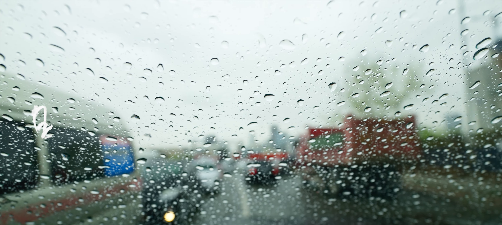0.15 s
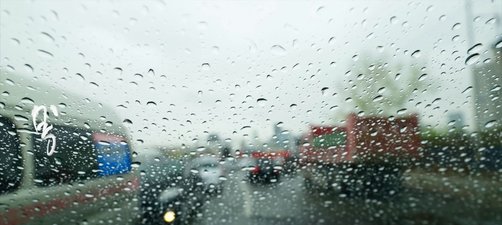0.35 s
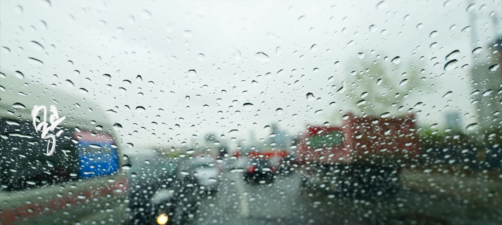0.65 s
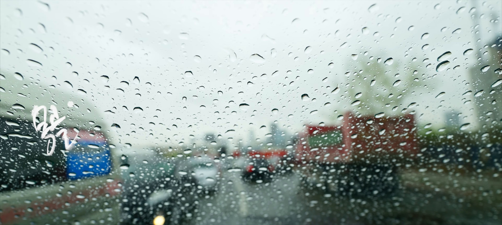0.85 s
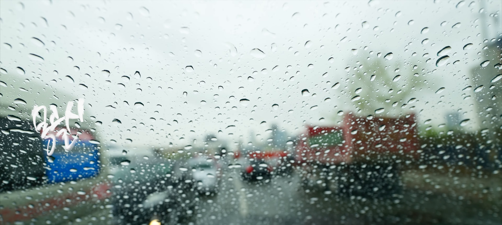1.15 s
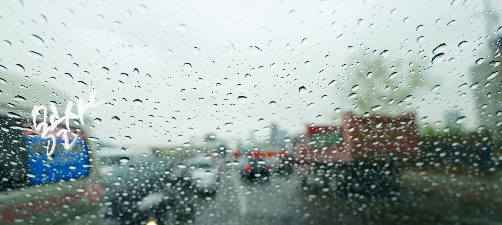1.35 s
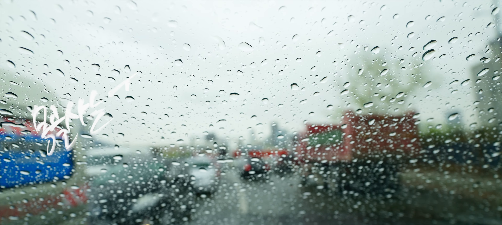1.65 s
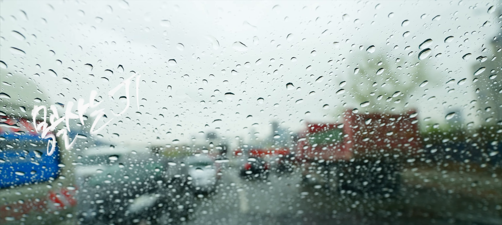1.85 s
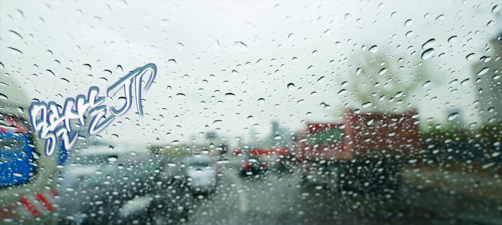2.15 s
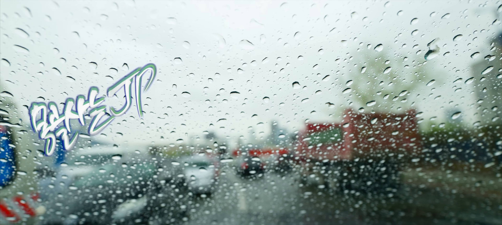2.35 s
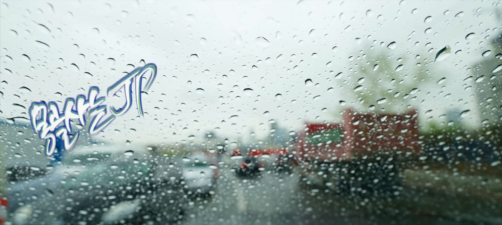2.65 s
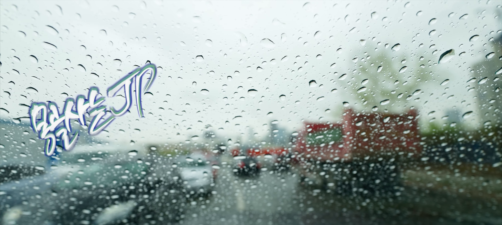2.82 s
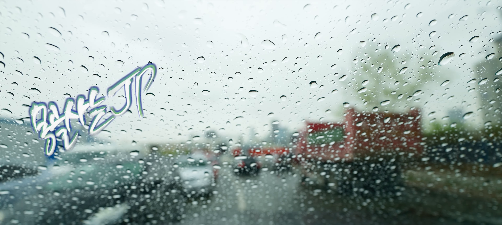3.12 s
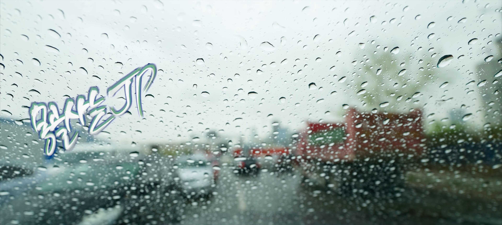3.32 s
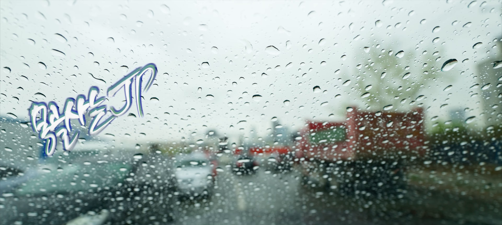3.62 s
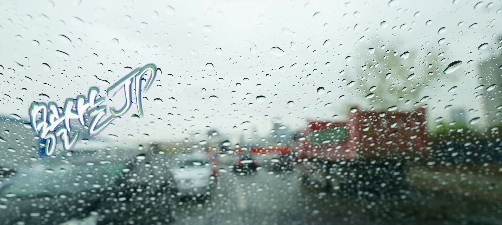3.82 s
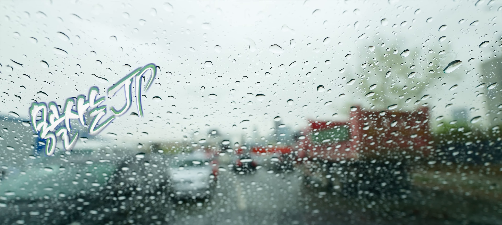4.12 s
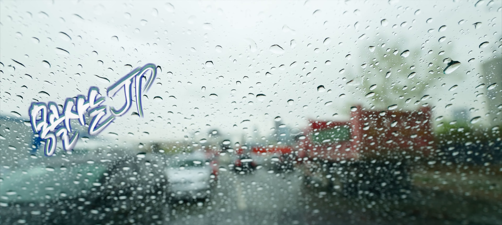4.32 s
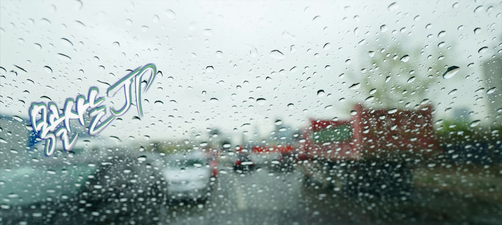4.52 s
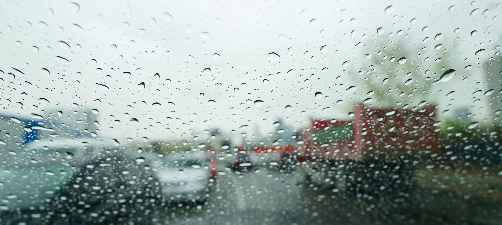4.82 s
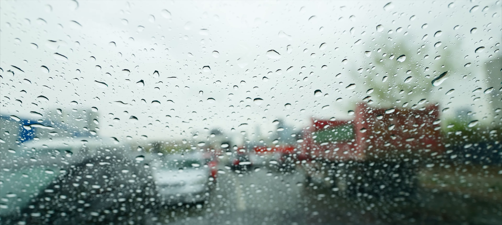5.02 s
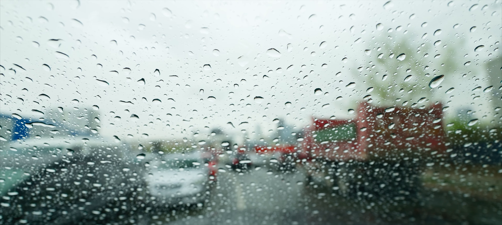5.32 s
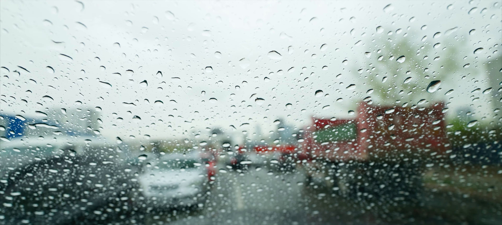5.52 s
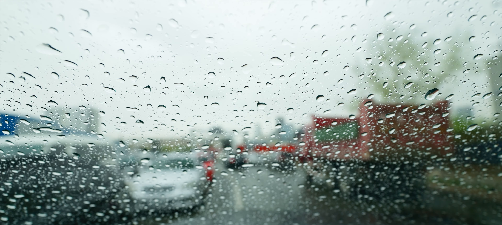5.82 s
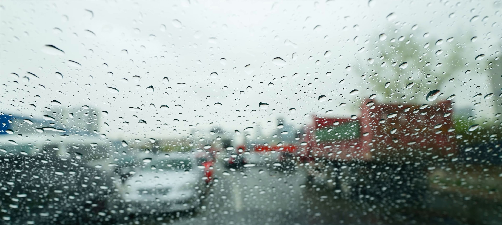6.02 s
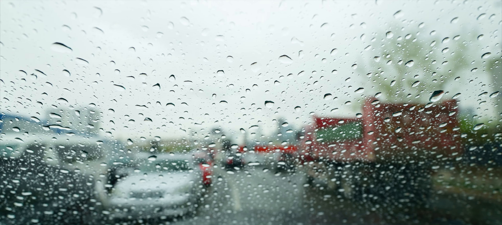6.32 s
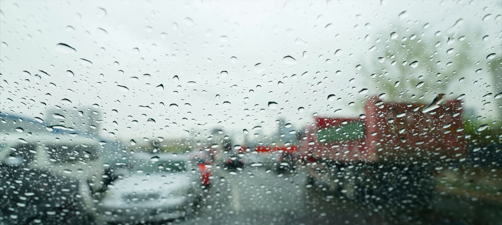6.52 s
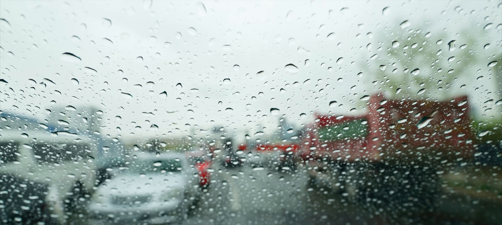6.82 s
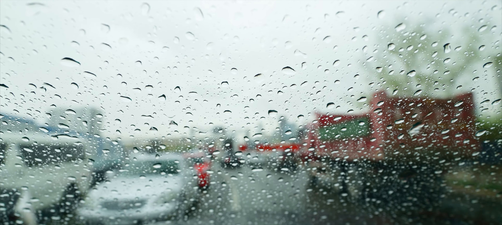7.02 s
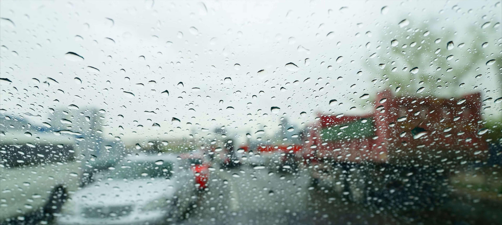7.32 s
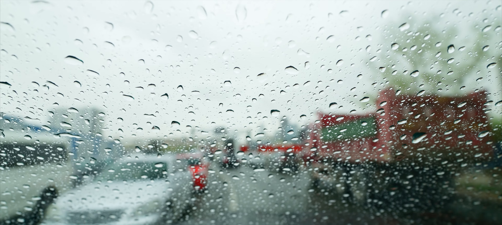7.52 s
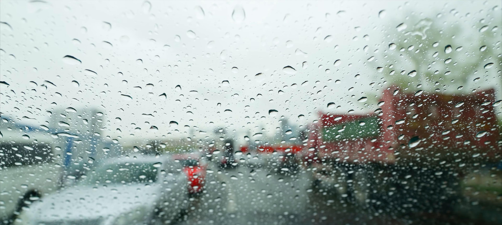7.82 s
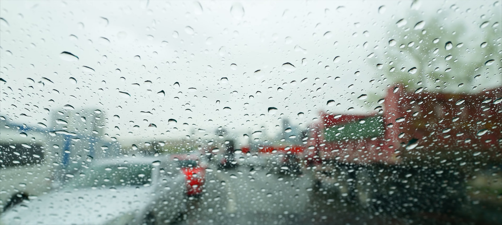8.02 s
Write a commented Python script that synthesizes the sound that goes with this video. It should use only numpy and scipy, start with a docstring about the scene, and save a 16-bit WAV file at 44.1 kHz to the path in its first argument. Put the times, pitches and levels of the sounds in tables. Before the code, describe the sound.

Rain patters on a car's roof and windshield over road rumble, heard from inside as an engine hums and later revs up.

```python
"""Rainy traffic from inside a car

Drops patter on the lined roof and tick on the windshield, a few fat ones slapping the glass,
over a bed of road rumble and tyre roar. A low engine hum climbs in pitch, then drops back towards
idle. The body takes one soft bump; then the engine revs up, booming in the cabin and growling
in the exhaust, with a wet-tyre rush that grows with speed."""
import sys
import numpy as np
from scipy import signal
from scipy.fft import rfft, irfft, next_fast_len
from scipy.io import wavfile

SR = 44100
rng = np.random.default_rng(int(sys.argv[2]) if len(sys.argv) > 2 else 0)


def dump_mix(stems):
    """Bounce the given channels to the path in sys.argv[1] as a 16-bit WAV at rate SR."""
    frames = np.atleast_2d(stems).T  # one column per channel
    limited = np.clip(frames, -1, 1)  # hard clip at full scale
    pcm = np.round(limited * 32767).astype(np.int16)
    wavfile.write(sys.argv[1], SR, pcm)


N = 359876

# how hard the rain hits: (time [s], roof level [dB], windshield drive [dB])
RAINFALL = [(0, -35.5, -54), (0.45, -37, -54.5), (0.65, -36.5, -51), (1.4, -37, -52), (2.0, -36, -48.5),
            (2.9, -34.5, -48.5), (3.25, -35, -44.5), (3.8, -33, -44), (4.05, -34, -48.5), (4.7, -36, -45.5),
            (5.0, -34, -45.5), (5.3, -35.5, -45.5), (5.65, -33, -45.5), (6.7, -33, -44),
            (7.1, -32.5, -44.0), (7.75, -31.5, -46.0), (8.16, -35, -47)]
# drops landing together: (time [s], lift [dB])
FLURRIES = [(.53, 3), (1.54, 3), (2.48, 4.5), (3.06, 1.5), (3.26, 2.5), (3.47, 0), (4.19, 2), (4.88, 4),
            (5.6, 4), (5.83, 1), (6.07, 2), (6.52, 2), (7.089, 2), (7.74, 2)]
# a brief gap in the rain: (time [s], half length [s], dip [dB])
LULL = (5.912, 0.013, -5)
# panel and cabin resonances under the rain: (frequency [Hz], width [Hz], lift [dB])
PANEL_MODES = [(751, 80, 3), (945, 150, 1.8), (1122, 48, -4.5), (1250, 51, 1), (1450, 50, 3.5),
               (1930, 46, 1.5), (2450, 63, 4.5), (2710, 57, 2.9), (2984, 93, 3), (3370, 200, 0)]
# tone of the drops and the high hiss: (frequency [Hz], relative level [dB])
ROOF_EQ = [(200, -5), (450, 1), (700, -1.5), (1000, 1), (1500, -0.5), (2200, -6.5), (3000, -8.5),
           (4000, -15), (6000, -25.5), (9000, -48.5), (15000, -69)]
GLASS_EQ = [(400, -18), (1200, -5.5), (2200, 0.5), (3000, 3), (3900, -1.5), (5000, -6.5), (6000, -12),
            (6600, -16.5), (7150, -15), (7600, -26), (8800, -23), (10500, -31.5), (15500, -59)]
CRACK_EQ = [(1500, -16), (4000, -10.5), (7000, 10), (9000, 1), (12000, -3.5), (15500, -14), (19000, -31.5)]
SPLAT_EQ = [(500, -12), (1500, -4), (3000, 0), (4500, -5), (6000, -10.5), (7200, -14), (8000, -20.5),
            (11000, -31.5), (15500, -33)]
SIZZLE_EQ = [(2000, -18), (5000, 7), (9500, -2), (15500, -11)]
# tone of the road bed: (frequency [Hz], relative level [dB])
RUMBLE_EQ = [(5, -43), (14, -13.5), (22, -4), (32, -6.5), (44, -2), (62, -3), (85, -14), (150, -24.5),
             (400, -76), (2000, -110)]
DRONE_EQ = [(30, -18), (60, 2), (88, -6), (108, 13), (128, 8), (150, 3.5), (185, 0), (235, -3.8), (300, -8),
            (600, -56), (2000, -100)]
TYRE_EQ = [(150, -14.5), (215, -2.5), (278, -0.5), (320, -2), (360, -1), (405, -5), (455, 1), (530, -6),
           (620, -15.5), (1200, -22), (4000, -57.5), (10000, -93)]
# swells of the traffic's tyre roar and the body's rumble: (time [s], level [dB])
TYRE_LEVEL = [(0, -40.5), (1, -39.5), (2, -37.5), (3.6, -34), (4.5, -34.5), (5.2, -36.5), (6, -34.5),
              (7, -32), (8.16, -30)]
RUMBLE_LEVEL = [(0, -27.5), (.75, -30), (1.1, -26.5), (3.6, -24.5), (5.3, -27), (8.16, -27)]
# heavy drops on the windshield: (time [s], relative splat level [dB], relative crack level [dB])
FAT_DROPS = [(0.4305, -30, -54), (0.5242, -30, -65), (1.2271, -27, -62), (1.5205, -25, -56.5),
             (2.469, -27, -61), (3.0574, -22, -53), (3.2074, -24, -50), (3.5249, -23, -52),
             (3.7988, -30, -52), (3.8524, -23, -56), (4.3804, -27, -54), (5.0084, -27, -51),
             (5.3028, -24, -55), (5.5087, -26, -49), (5.6962, -20.5, -53), (5.7747, -20.5, -56),
             (5.8494, -23, -62), (5.9592, -24, -50), (6.1703, -31, -49), (6.2114, -21.5, -51),
             (6.9636, -26, -54), (7.0404, -22, -50), (7.485, -23, -60), (7.5384, -21, -49),
             (7.5638, -22, -49)]
# one swell of high hiss: (time [s], half length [s], level [dB])
SIZZLE_SWELL = (.8, 0.22, -60)
# engine speed for the low hum and the later rev: (time [s], crank speed [turns/s])
HUM_SPEED = [(0.9, 20.2), (1.58, 23), (2.19, 24.9), (2.44, 26.7), (2.96, 31.5), (4.34, 36.7), (4.6, 23)]
REV_SPEED = [(4.2, 22.6), (5.37, 22), (5.91, 23.2), (6.25, 25), (7.06, 34.3), (7.39, 37.9), (7.73, 40.7),
             (8.16, 40.4)]
# engine effort; the rev surges at idle, then opens up: (time [s], drive [dB])
HUM_EFFORT = [(.9, -25), (1.2, -19), (1.65, -31), (2.65, -18), (3.25, -18), (4.3, -23), (4.6, -29)]
REV_EFFORT = [(2.9, -27), (4.25, -27), (4.5, -17.5), (4.68, -26), (4.95, -17.5), (5.3, -17), (5.6, -26),
              (6.0, -14), (6.4, -12.5), (7.78, -12), (8.16, -32)]
# engine harmonics: (order [multiple of crank speed], relative level [dB])
HUM_ORDERS = [(2, -0.5), (4, -6.5)]
REV_ORDERS = [(2, -.7), (3, -5.5), (4, -.3), (5, -20)]
# the cabin's standing waves: (frequency [Hz], gain [dB])
CABIN_BOOM = [(36, -7), (50, 1.5), (60, -5.5), (71, -6), (80, -12.5), (90, -24.5), (100, -8.5), (110, -4.5),
              (121, -0.5), (134, -2.5), (137.5, -13.5), (141.5, -4.5), (158, -0.5), (166, -11)]
# a knock through the suspension: (time [s], drive [dB])
BUMP = (5.423, -14.5)
# the car body's ring: (frequency [Hz], relative level [dB], t60 [s])
BODY_MODES = [(166, 1.5, 0.071), (207, -0.5, 0.075), (410, -3.5, 0.055)]
# narrow exhaust resonances, plus one broad band of wet-tyre rush:
# (frequency [Hz], nominal width [Hz], relative level [dB])
GROWL_AND_RUSH_BANDS = [(274, 19.7, -2.5), (338.4, 18.5, -5.5), (357, 26, -17), (890, 40, -18),
                        (755, 450, -29), (1440, 21, -17.5)]


def from_db(db):
    """Decibels to gain."""
    return 10 ** (np.asarray(db) / 20)


def rms_one(x):
    """Scale to unit rms."""
    return x / np.sqrt(np.mean(x ** 2) + 1e-20)


def peak_one(x):
    """Scale to unit peak."""
    return x / np.max(np.abs(x))


def in_time(rows):
    """One value per sample for each column of an envelope."""
    times, *columns = np.transpose(rows)
    return [np.interp(np.arange(N) / SR, times, column) for column in columns]


def drift(rate_hz):
    """Slow random wobble of about unit rms."""
    pole = np.exp(-80 * np.pi * rate_hz / SR)   # one step per 40 samples
    slow = signal.lfilter([1], [1, -2 * pole, pole * pole], rng.standard_normal(N // 40 + 2002))[2000:]
    return np.interp(np.arange(N) / 40, np.arange(len(slow)), rms_one(slow))


def colour(x, eq, resonances=()):
    """Minimum-phase EQ with resonances on top."""
    size = 2 * next_fast_len(N // 2 + SR // 4)
    hz = np.maximum(np.arange(size // 2 + 1) * SR / size, 1)
    eq_hz, eq_db = np.transpose(eq)
    db = np.interp(np.log(hz), np.log(eq_hz), eq_db)
    for centre, width, lift in resonances:
        db = db + lift / (1 + (2 * (hz - centre) / width) ** 2)
    cepstrum = irfft(np.log(from_db(db)))
    cepstrum[1:size // 2] *= 2   # folded onto positive time, so nothing rings early
    cepstrum[size // 2 + 1:] = 0
    return irfft(rfft(x, size) * np.exp(rfft(cepstrum)))[:N]


def noise(eq):
    """Coloured noise of unit rms."""
    return rms_one(colour(rng.standard_normal(N), eq))


def resonate(x, hz, width_hz):
    """One resonance with unity gain at its peak."""
    r = np.exp(-np.pi * width_hz / SR)
    feedback = [1, -2 * r * np.cos(2 * np.pi * hz / SR), r * r]
    return signal.lfilter((1 - r * r) / 2 * np.array([1, 0, -1]), feedback, x)


def flurries(rise_s=0.016):
    """The rain's quick swings in dB: a random flutter, fast-rising flurries and one lull."""
    t = np.arange(N) / SR
    swing_db = 0.7 * drift(rate_hz=9)
    for at_s, lift_db in FLURRIES:
        age = np.maximum((t - at_s) / rise_s + 0.5, 0)
        swing_db += lift_db * age * np.exp(1 - age)
    at_s, half_s, dip_db = LULL
    return swing_db + dip_db * np.exp(-((t - at_s) / half_s) ** 2)


def impacts(per_s, spread_db, max_spreads):
    """Random drop impacts: many small, a few large."""
    sizes = from_db(spread_db * np.minimum(rng.exponential(1, N), max_spreads))
    return sizes * rng.choice([-1, 1], N) * (rng.random(N) < per_s / SR)


def on_panel(clicks, t60, ring_db, cabin_db, cabin_t60=0.063, spots=12):
    """Each drop lands on one of several spots: a click, that spot's dense ring, a short cabin tail."""
    t = np.arange(SR // 8) / SR
    decays = from_db(-60 * t / np.array([[t60], [cabin_t60]]))
    spot, out = rng.integers(0, spots, N), np.zeros(N)
    for k in range(spots):
        ring, tail = rng.standard_normal((2, len(t))) * decays
        response = from_db(ring_db) * ring / np.linalg.norm(ring)
        response += from_db(cabin_db) * tail / np.linalg.norm(tail)
        response[0] += 1   # the dry click
        out += signal.oaconvolve(clicks * (spot == k), response)[:N]
    return out


def roof(level_db):
    """Dense patter, dulled by the roof lining."""
    hits = impacts(per_s=3400, spread_db=2.5, max_spreads=3.7)
    patter = on_panel(hits, t60=0.02, ring_db=8, cabin_db=1.5)
    return from_db(level_db) * rms_one(colour(patter, ROOF_EQ, PANEL_MODES))


def windshield(drive_db):
    """Ticks on the glass, thicker in heavier rain; drops that hit a dry spot crack sharply."""
    flow = from_db(drive_db - np.mean(drive_db))
    hits = impacts(per_s=900 * flow, spread_db=5, max_spreads=3.3)
    ticks = on_panel(hits, t60=0.012, ring_db=-4.5, cabin_db=-1)
    dry_hits = impacts(per_s=120 * flow, spread_db=4.2, max_spreads=2.9)
    cracks = on_panel(dry_hits, t60=0.002, ring_db=-3, cabin_db=-10)
    glass = from_db(7) * rms_one(colour(ticks, GLASS_EQ, PANEL_MODES))
    glass += from_db(-19.5) * rms_one(colour(cracks, CRACK_EQ))
    return from_db(drive_db) * glass / np.sqrt(flow)   # denser ticks already carry part of the swell


def road():
    """Deep body rumble, with a cabin drone that rides the traffic's tyre roar."""
    tyre_db, = in_time(TYRE_LEVEL)
    rumble_db, = in_time(RUMBLE_LEVEL)
    drone_db = -27.5 + 1.31 * (tyre_db - tyre_db.mean())
    rumble = from_db(rumble_db) * noise(RUMBLE_EQ)
    drone = from_db(drone_db) * noise(DRONE_EQ)
    return rumble + drone + from_db(tyre_db) * noise(TYRE_EQ)


def fat_drops(splat_peak_db=-18, crack_peak_db=-31.5):
    """Single heavy drops slap the glass close by: a hard crack at contact and a duller splat."""
    times, splat_db, crack_db = np.transpose(FAT_DROPS)
    splat_hits, crack_hits = np.zeros((2, N))
    at = np.round(times * SR).astype(int)
    splat_hits[at], crack_hits[at] = from_db(splat_db), from_db(crack_db)
    splats = colour(on_panel(splat_hits, t60=0.0095, ring_db=3.5, cabin_db=0.5), SPLAT_EQ, PANEL_MODES)
    cracks = colour(on_panel(crack_hits, t60=0.002, ring_db=-1.5, cabin_db=-11), CRACK_EQ)
    return from_db(splat_peak_db) * peak_one(splats) + from_db(crack_peak_db) * peak_one(cracks)


def sizzle():
    """A faint high hiss comes and goes."""
    at_s, half_s, db = SIZZLE_SWELL
    swell = np.exp(-((np.arange(N) / SR - at_s) / half_s) ** 2)
    return from_db(db) * swell * noise(SIZZLE_EQ)


def engine(turns_per_s, orders, roughness, flutter_hz):
    """Harmonics of the crank speed, each trembling with uneven firing."""
    crank_angle = 2 * np.pi * np.cumsum(turns_per_s * (1 + 0.00384 * drift(rate_hz=6.8))) / SR
    out = np.zeros(N)
    for order, db in orders:
        tremble = 1 + roughness * drift(flutter_hz)
        out += np.sqrt(2) * from_db(db) * tremble * np.sin(order * crank_angle + rng.uniform(0, 2 * np.pi))
    return out


def boom(speed_rows, effort_rows, orders, flutter_hz):
    """Each order rides the effort, swelling and sinking as it sweeps the cabin's standing waves."""
    speed, = in_time(speed_rows)
    effort_db, = in_time(effort_rows)
    hz, cabin_db = np.transpose(CABIN_BOOM)
    levels = [(order, effort_db + db + np.interp(order * speed, hz, cabin_db)) for order, db in orders]
    return engine(speed, levels, roughness=0.14, flutter_hz=flutter_hz)


def fader(rows, fade_s):
    """Fade in from an envelope's first point and out after its last."""
    t = np.arange(N) / SR
    return np.clip((t - rows[0][0]) / fade_s, 0, 1) * np.clip(1 + (rows[-1][0] - t) / fade_s, 0, 1)


def engine_hum():
    """A low engine hum climbs in pitch, then drops back towards idle."""
    return fader(HUM_EFFORT, fade_s=0.15) * boom(HUM_SPEED, HUM_EFFORT, HUM_ORDERS, flutter_hz=18)


def engine_rev():
    """Four cylinders fire twice a turn, idling then revving up; the low orders boom in the cabin."""
    return fader(REV_EFFORT, fade_s=0.33) * boom(REV_SPEED, REV_EFFORT, REV_ORDERS, flutter_hz=15)


def bump(attack_s=0.003):
    """A soft knock sets the body ringing briefly."""
    at_s, drive_db = BUMP
    t = np.maximum(np.arange(N) / SR - at_s, 0)
    modes = sum(from_db(db - 60 * t / t60) * np.sin(2 * np.pi * hz * t) for hz, db, t60 in BODY_MODES)
    return from_db(drive_db) * modes * (1 - np.exp(-t / attack_s))


def growl_and_rush(start_s=5.95, opening_s=0.35, db_per_octave=12.5):
    """Upper orders and puffs ring narrow exhaust resonances; a broad wet-tyre rush grows with speed."""
    speed, = in_time(REV_SPEED)
    effort_db, = in_time(REV_EFFORT)
    load_db = -23.3 + 0.43 * (effort_db - effort_db.max())
    revs_db = db_per_octave * np.log2(speed / speed.max())
    firing = 1 + 0.92 * np.cos(2 * np.pi * np.cumsum(2 * speed) / SR)
    puffs = firing * rng.standard_normal(N)
    upper_orders = [(order, -22.5) for order in range(5, 15)]
    drive = puffs + engine(speed, upper_orders, roughness=0.51, flutter_hz=16)
    bands = sum(from_db(db) * resonate(resonate(drive, hz, 2 * width), hz, 2 * width)
                for hz, width, db in GROWL_AND_RUSH_BANDS)
    throttle = np.clip((np.arange(N) / SR - start_s) / opening_s, 0, 1)
    return throttle * from_db(load_db + revs_db) * rms_one(bands)


def scene():
    """Mono mix: rain above, engine and road below."""
    roof_db, glass_db = in_time(RAINFALL)
    flurry_db = flurries()   # the glass feels these more than the roof
    rain = roof(roof_db + 0.74 * flurry_db) + windshield(glass_db + 0.97 * flurry_db) + fat_drops()
    return (rain + sizzle() + engine_rev() + growl_and_rush() + engine_hum() + road() + bump())[None]


def record(dry):
    """Faint hiss, softened ends, then a steep top cut."""
    hiss_db, fade_s, cutoff_hz = -67, 0.004, 15800
    fade_in = np.minimum(np.arange(N) / (fade_s * SR), 1)
    hissy = dry + from_db(hiss_db) * rng.standard_normal(dry.shape)
    top_cut = signal.ellip(12, 0.1, 80, cutoff_hz, fs=SR, output="sos")
    return signal.sosfilt(top_cut, hissy * fade_in * fade_in[::-1])


dry = scene()
out = record(dry)
dump_mix(out)
```